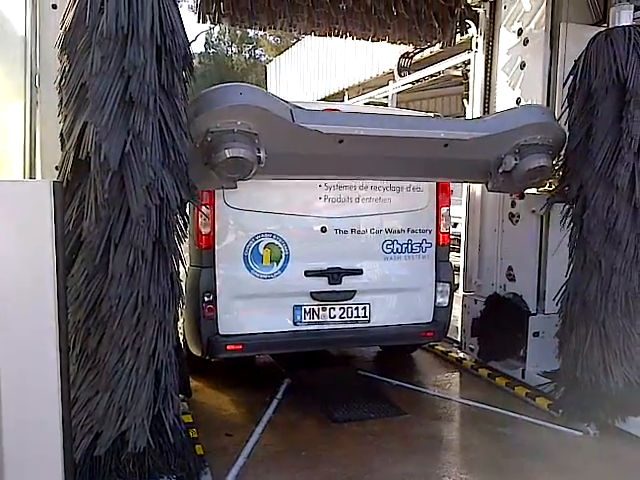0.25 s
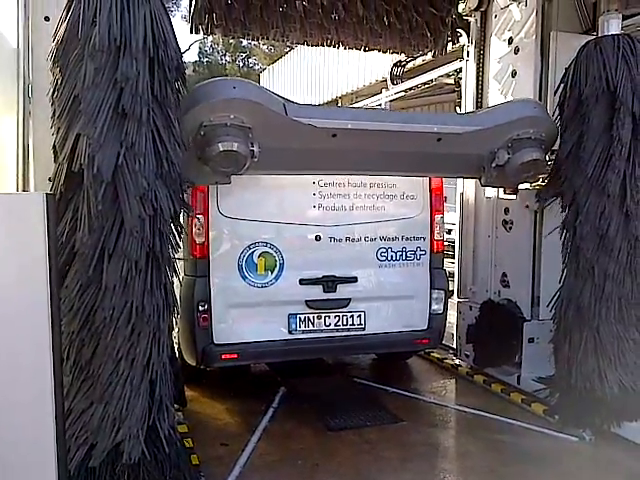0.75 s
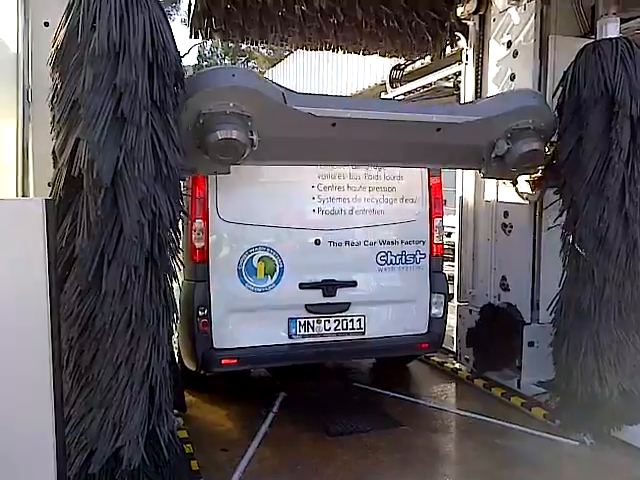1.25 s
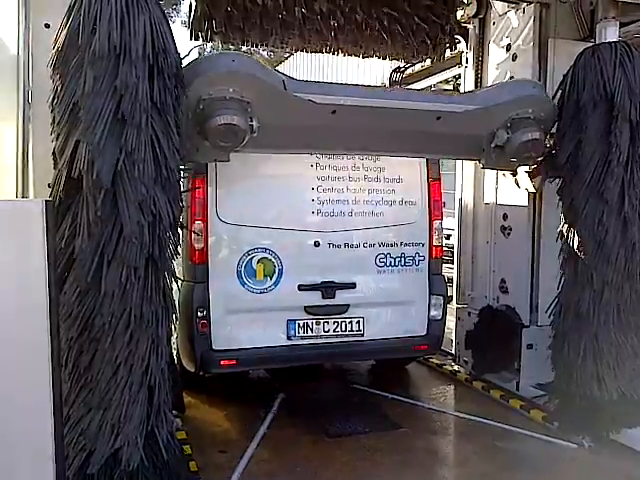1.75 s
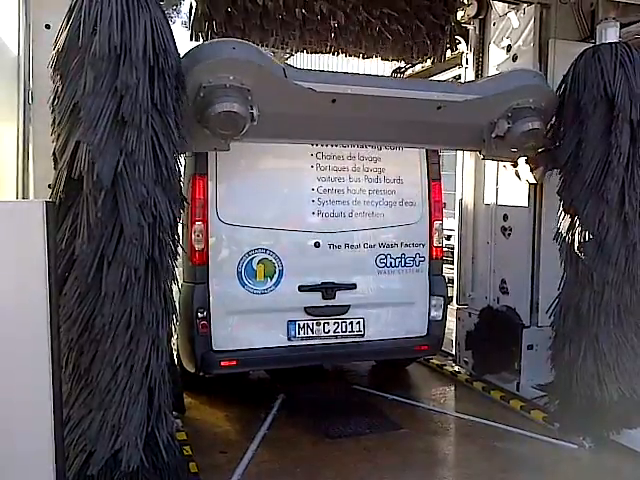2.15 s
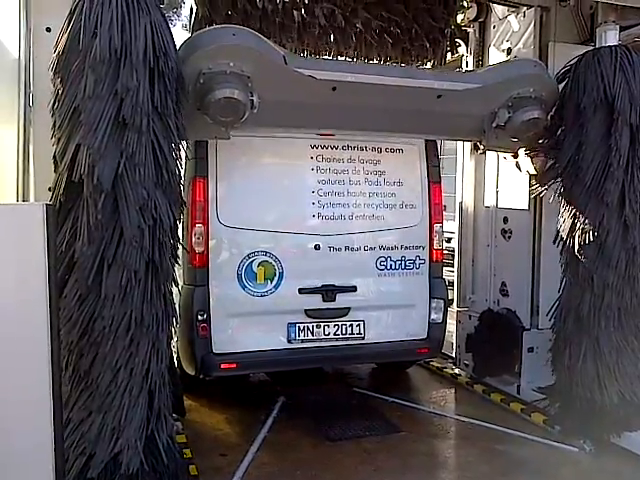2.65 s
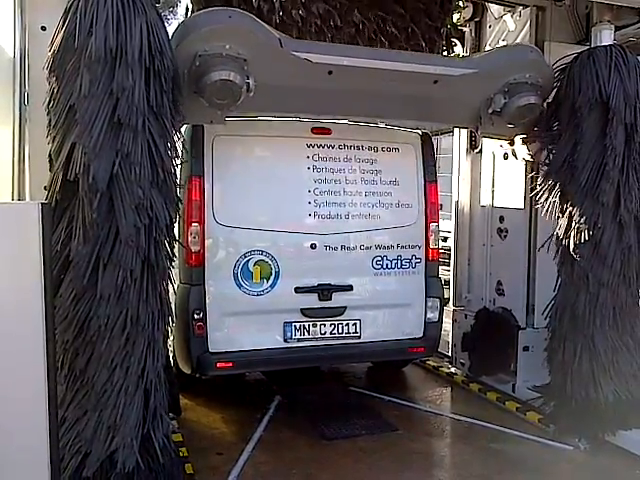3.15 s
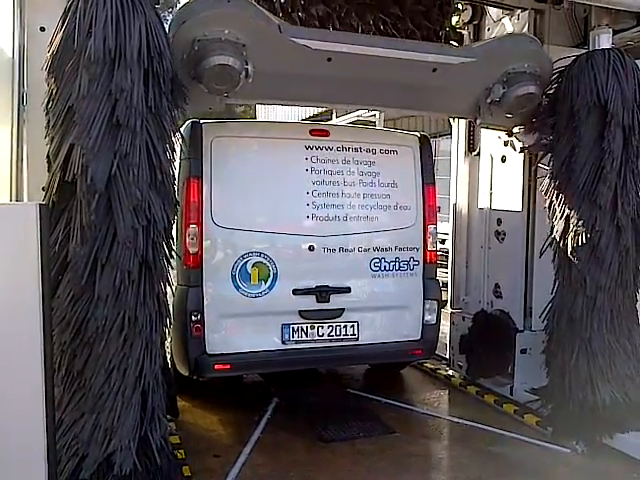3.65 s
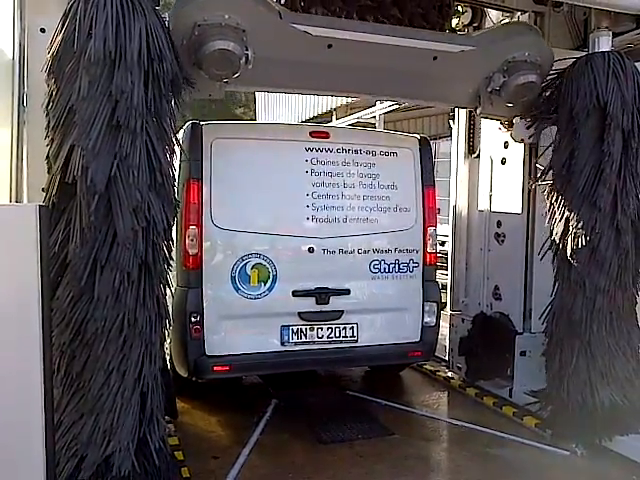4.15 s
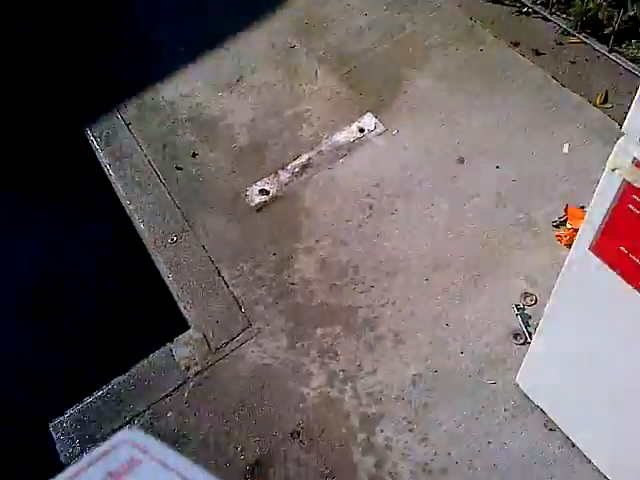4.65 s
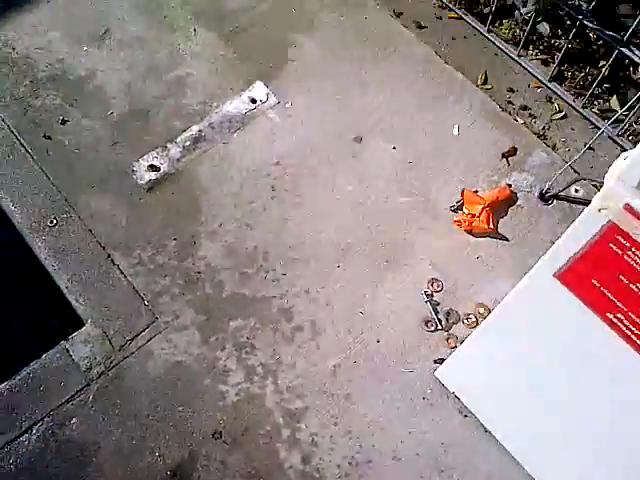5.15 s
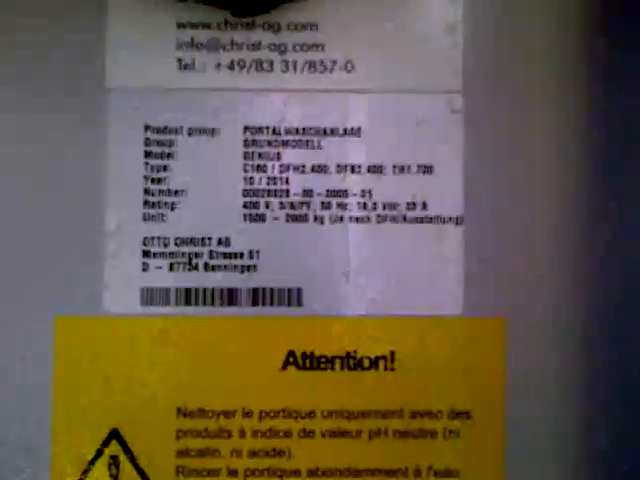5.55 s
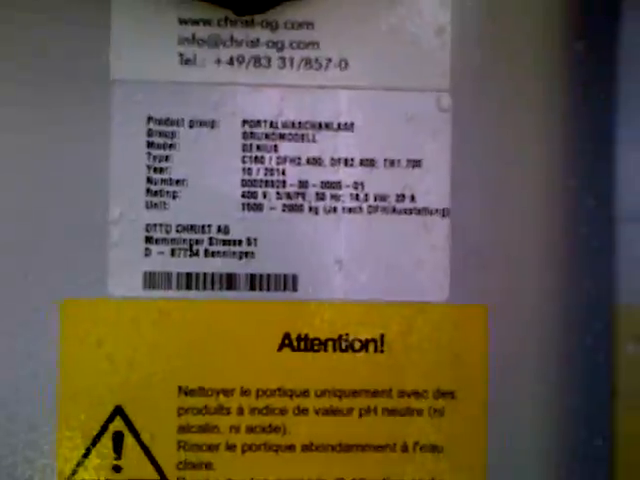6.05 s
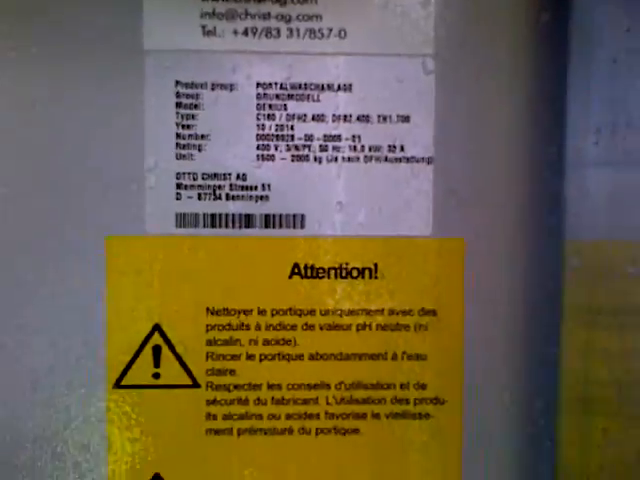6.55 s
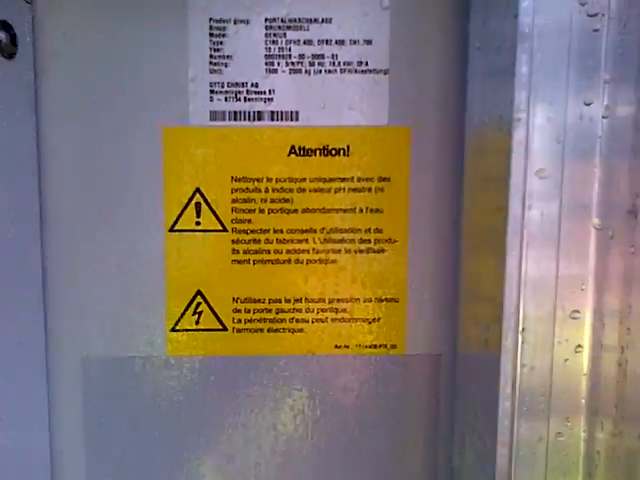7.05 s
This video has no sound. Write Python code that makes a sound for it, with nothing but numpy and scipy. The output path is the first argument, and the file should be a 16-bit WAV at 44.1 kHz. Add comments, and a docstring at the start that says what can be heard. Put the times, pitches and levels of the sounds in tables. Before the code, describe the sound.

Steady brush-and-water rush with a beating mid-pitched hum dulls as the microphone turns away, ticks slightly, then snaps to hissing spray beside a panel.

```python
"""Wet brushes and spray rush over a van in a rollover car wash: noise and drop impacts, coloured by filters.
Behind them two drive motors hum in slow beats (paired sines), a pump whines (sines) and a faint rumble lies below.
The microphone turns away from the bay, which dulls the rush, and short pulses make small handling ticks.
Then, with a click, the sound switches at once to bright spray close beside a metal panel of the machine,
where sliding filters make the rush ring; the hum is gone and the pump whine goes on."""
import sys
import numpy as np
from scipy import signal
from scipy.fft import rfft, irfft, next_fast_len
from scipy.io import wavfile
from scipy.ndimage import map_coordinates

SR = 44100
rng = np.random.default_rng(int(sys.argv[2]) if len(sys.argv) > 2 else 0)


def wav_record(signal):
    """Record a signal, one row per channel, as 16-bit PCM in the file named by sys.argv[1]."""
    frames = np.transpose(np.atleast_2d(signal))
    bounded = np.clip(frames, -1, 1)
    # unit amplitude maps onto the largest positive 16-bit level
    quanta = np.round(bounded * 32767).astype(np.int16)
    wavfile.write(sys.argv[1], SR, quanta)


N = 321434
TIME = np.arange(N) / SR  # s
HZ = np.fft.rfftfreq(N, 1 / SR)
SWITCH_S = 5.5772  # from the bay to the close spray


def gain_of(db):
    """Turns decibels into amplitude."""
    return 10 ** (np.asarray(db) / 20)


def evened(x):
    """Scales a sound to an average (rms) level of 1."""
    return x / np.sqrt(np.mean(x ** 2) + 1e-20)


def curve(rows, axis=1):
    """Joins one column of a table by straight lines in time."""
    columns = np.transpose(rows)
    return np.interp(TIME, columns[0], columns[axis])


def wander(rate_hz):
    """Random drift of rms 1, mostly slower than the given rate."""
    size = next_fast_len(N, real=True)
    hz = np.fft.rfftfreq(size, 1 / SR)
    slow = rfft(rng.standard_normal(size)) / (1 + (hz / rate_hz) ** 4)
    return evened(irfft(slow, size)[:N])


def tone(db, phase):
    """A pure tone with the given rms level in dB."""
    return gain_of(db) * np.sqrt(2) * np.sin(phase)


def pulse(s, rise_s):
    """A single push from time s: it reaches 1 after rise_s, then dies away."""
    u = np.clip((TIME - s) / rise_s, 0, 40)
    return u * np.exp(1 - u)


def band(x, hz, width):
    """Picks out one fixed band, like a resonance with gain 1 at its centre."""
    return signal.lfilter(*signal.iirpeak(hz, hz / width, fs=SR), x)


def resonate(x, hz, width):
    """Picks out a moving band: shift it down to zero, smooth it, shift it back up."""
    turn = np.exp(2j * np.pi * np.cumsum(hz) / SR)
    r = np.exp(-np.pi * width / SR)
    smoothed = signal.lfilter([1 - r], [1, -r], x / turn)
    return 2 * (turn * smoothed).real


def lifted(x, rows, width):
    """Raises or lowers one moving band; rows are (time [s], frequency [Hz], lift [dB])."""
    return x + resonate(x, curve(rows), width) * (gain_of(curve(rows, axis=2)) - 1)


def spectrum(points):
    """Joins points of a tone colour in dB along a logarithmic frequency axis."""
    hz, db = np.transpose(points)
    return np.interp(np.log(HZ + 1), np.log(hz + 1), db)


def lifts(modes):
    """Adds up bell-shaped peaks and dips in dB, one for each resonance."""
    return sum(db * np.exp(-2 * ((HZ - hz) / width) ** 2) for hz, width, db in modes)


def coloured(x, db):
    """Filters noise to a tone colour, scaled so the part above 500 Hz has rms 1 for white noise."""
    gain = gain_of(db)
    return irfft(rfft(x) * gain / np.sqrt(np.mean(gain ** 2 * (HZ > 500))), N)


def water(drops_per_s, drops_db, spread_db, flutter_db, flutter_hz):
    """Fine mist (noise) plus single drop impacts of random size, in uneven flurries."""
    sizes = gain_of(spread_db * np.minimum(rng.exponential(1, N), 4)) * rng.choice([-1, 1], N)
    drops = evened(sizes * (rng.random(N) < drops_per_s / SR))
    mist = rng.standard_normal(N)
    flurries = gain_of(flutter_db * wander(flutter_hz))
    return evened((mist + gain_of(drops_db) * drops) * flurries)


# how far the microphone has turned from the bay: (time [s], share turned away [0-1])
TURN_AWAY = [(0, 0.02), (4.47, 0.05), (4.51, 0.55), (4.8, 0.68), (5.1, 0.9), (5.57, 0.79)]


def turned_away():
    """The share of the turn made so far; it fades the rush between two colours and shifts the hum's beat."""
    return curve(TURN_AWAY)


def shade_db():
    """The level in dB lost as the microphone swings away from the bay."""
    shade, swing_s, swing_length_s = -5, 4.475, 0.11  # dB, s, s
    return shade * np.clip((TIME - swing_s) / swing_length_s, 0, 1)


def rumble(bay_db, close_db, corner_hz):
    """The little deep rumble that the small microphone lets through: noise without its treble."""
    low = evened(irfft(rfft(rng.standard_normal(N)) / (1 + (HZ / corner_hz) ** 4), N))
    return low * gain_of(np.where(TIME < SWITCH_S, bay_db, close_db))


def switch_click(snap_db, thump_db, thump_s):
    """A very short snap and a longer opposite push mark the sudden change."""
    snap = gain_of(snap_db) * pulse(SWITCH_S, 0.00005)
    return snap - gain_of(thump_db) * pulse(SWITCH_S, thump_s)


def tick(s, db, hz, length, edge_db):
    """A sharp contact of a few cycles, a little scuff and the brief ring of the plastic case."""
    turns = 2 * np.pi * (TIME - s)
    scratch = evened(band(rng.standard_normal(N), hz=4600, width=1100))
    scuff = gain_of(-16) * scratch * pulse(s, 1.6 * length)
    ring = pulse(s, length / 2) * np.sin(hz * turns)
    edge = gain_of(edge_db) * pulse(s, 0.00016) * np.sin(5100 * turns)
    return gain_of(db) * (ring + scuff) + edge


# bright ticks, before softening; the ring rises in half the length, the scuff in 1.6 times the length:
# (time [s], strength of ring and scuff [dB], ring frequency [Hz], length [s], strength of sharp edge [dB])
HANDLING_TICKS = [(4.4765, -17.5, 4480, 0.0012, -20), (4.8120, -22, 4500, 0.0005, -25),
                  (4.8135, -30, 5500, 0.0005, -34), (5.0145, -20, 3900, 0.0008, -27),
                  (5.0190, -29, 4900, 0.0009, -35), (5.5183, -14.5, 5200, 0.00064, -23),
                  (5.558, -18, 4463, 0.00065, -22.5)]
# dull bumps: (time [s], peak level [dB], rise time [s])
HANDLING_BUMPS = [(3.52, -55, .005), (4.493, -45, 0.0028), (5.016, -45, .0007)]


def handling():
    """Short plastic ticks and dull bumps of the hand; the microphone softens the ticks above 6300 Hz."""
    soften = signal.butter(6, 6300, fs=SR, output="sos")
    ticks = signal.sosfilt(soften, sum(tick(*row) for row in HANDLING_TICKS))
    bumps = sum(gain_of(db) * pulse(s, rise_s) for s, db, rise_s in HANDLING_BUMPS)
    return ticks + bumps


# the main whine, before a small random waver: (time [s], level [dB])
PUMP_WHINE = [(0, -46.5), (.9, -34), (1.4, -42), (1.8, -30), (1.98, -41), (2.22, -30.5), (2.37, -25.5),
              (2.6, -37), (2.76, -32), (3.15, -33), (3.6, -48), (4.7, -38), (5.55, -52.5), (5.6, -28.5),
              (6.75, -47.5), (7.08, -41), (7.22, -21), (7.29, -33)]
# the slightly lower whine, before its waver: (time [s], level [dB])
LOWER_WHINE = [(0, -50), (.3, -37.5), (1.0, -37.5), (1.3, -46.5), (3.8, -46.5), (4.1, -33.5), (4.5, -45),
               (7.29, -48)]


def pump():
    """Thin wavering whines: a tone, its octave (stronger beside the panel) and a slightly lower tone."""
    pump_hz, lower_hz = 1712, 1626
    octave_bay_db, octave_close_db = -52, -40.5
    phase = 2 * np.pi * pump_hz * TIME + 0.45 * wander(5) + 0.12 * wander(25)
    whine = tone(curve(PUMP_WHINE) + 0.74 * wander(12), phase)
    octave_db = np.where(TIME < SWITCH_S, octave_bay_db, octave_close_db)
    octave = tone(octave_db + 2.0 * wander(7), 2 * phase)
    lower_phase = 2 * np.pi * lower_hz * TIME + 0.5 * wander(4.4)
    lower = tone(curve(LOWER_WHINE) + 2.1 * wander(4.5), lower_phase)
    return whine + octave + lower


# both motors, before a small random waver:
# (time [s], level of the first motor [dB], strength of the second relative to the first [0-1])
MOTOR_HUM = [(0, -33, 1), (.34, -30.5, 0.7), (.66, -40, 0.95), (.78, -23.5, 0.1), (.87, -27, 0),
             (1.0, -23.5, 0), (1.14, -19, 0), (1.23, -31.5, 0.6), (1.33, -25.5, .5), (1.47, -30, 0.65),
             (1.53, -20.5, 0.5), (1.68, -45, 0.9), (1.88, -27, 0.54), (1.97, -24, .45), (2.06, -26, 0.1),
             (2.13, -22.5, 0.2), (2.2, -28, 0.15), (2.42, -19.5, 0), (2.7, -24, 0.24), (3.0, -22.5, 0.53),
             (3.12, -23.5, 0.46), (3.38, -22.5, 0), (3.5, -21.5, 0.8), (3.66, -27, 0.93),
             (4.2, -26.5, 0.37), (4.28, -23, 0.26), (4.48, -24, 0.7), (4.56, -19.5, 0.6),
             (4.68, -18.3, 0.5), (4.8, -19, 0.74), (5.07, -18, 0.6), (5.57, -17, 0.33)]
HUM_HZ = 437.9  # average of the first motor


def drive():
    """Two motors slightly out of step add and cancel in turn, so the hum throbs; turning shifts the beat."""
    beat_hz, octave_db = 2.03, -36  # the second motor runs lower by the beat
    first_lull_s, turn_shift = 0.19, -0.48  # s (before the turn's shift), cycles at a full turn
    phase = 2 * np.pi * np.cumsum(HUM_HZ + 0.56 * wander(4.6)) / SR + 0.054 * wander(23)
    beat = 2 * np.pi * (beat_hz * (TIME - first_lull_s) + turn_shift * turned_away())
    level = curve(MOTOR_HUM) + 1.1 * wander(22) + 0.3 * wander(5.5)
    second = np.clip(curve(MOTOR_HUM, axis=2), 0, 1) * tone(level, phase - beat)
    hum = tone(level, phase) - second
    octave_level = octave_db + shade_db() + 0.94 * wander(16)
    octave = tone(octave_level, 2 * phase - beat + 0.5 * wander(7.9))
    return hum + octave


# tone colour beside the panel: (frequency [Hz], relative level [dB])
BESIDE_PANEL = [(76, -56), (130, -38), (246, 0.5), (286, -1), (443, -12.5), (466, -10), (542, -2),
                (641, -11), (746, -6.5), (1010, -8), (1390, -5.5), (2460, -4.5), (3560, -6), (6190, -18.5),
                (7200, -35), (9360, -90), (15800, -120)]
# resonances of the machine's housing: (frequency [Hz], width [Hz], lift [dB])
HOUSING_RESONANCES = [(245, 27, 1.5), (288, 22, 2), (437, 86, 7), (591, 72, 4), (659, 30, 6),
                      (737, 65, 6.5), (856, 76, 7.5), (1035, 68, 2), (2410, 250, -5.5)]
# the way out from behind the panel: (time [s], share covered [0-1])
WAY_OUT = [(5.58, 0), (6.45, 0.22), (6.75, 0.43), (6.95, 0.8), (7.15, 1), (7.29, 1)]
# extra colour behind the panel: (frequency [Hz], width [Hz], lift [dB])
BEHIND_PANEL = [(1390, 260, 4.5), (2760, 480, -7.5), (5500, 1200, -3.5)]
# extra colour clear of the panel: (frequency [Hz], width [Hz], lift [dB])
CLEAR_OF_PANEL = [(348, 150, -4), (815, 130, -10), (1660, 350, 1.5), (5340, 530, 2)]
# the gap to the panel rings, sinking as the microphone backs off: (time [s], frequency [Hz], lift [dB])
GAP_RING = [(5.58, 3650, 3), (6.0, 3630, 3), (6.18, 3520, 3.5), (6.33, 3450, 6), (6.5, 3280, 5),
            (6.64, 3120, 6), (6.8, 2920, 2.5), (7.29, 2640, -15.5)]
# the hollow behind the panel rings and fades on stepping out: (time [s], frequency [Hz], lift [dB])
HOLLOW_RING = [(5.58, 1330, 3.5), (5.9, 1360, 1.5), (6.06, 1480, 5), (6.28, 1400, 2.5), (6.43, 1360, 3.5),
               (6.7, 1330, 1)]
# a lower ring that sinks on the way out: (time [s], frequency [Hz], lift [dB])
LOWER_RING = [(6.65, 2050, -2), (6.95, 1900, 1.5), (7.04, 1860, 4), (7.14, 1630, 5), (7.29, 1570, 2.5)]
# a higher ring that sinks on the way out: (time [s], frequency [Hz], lift [dB])
HIGHER_RING = [(6.65, 6500, 1.5), (6.82, 6300, 3.5), (6.98, 5500, 1), (7.14, 5320, 3.5), (7.29, 5000, 1.5)]
# lower sinking band that the panel's reflection weakens: (time [s], frequency [Hz], lift [dB])
LOWER_NOTCH = [(5.58, 2520, -7), (6.0, 2490, -0.5), (6.25, 2440, -1), (6.6, 2350, -1)]
# higher sinking band, weakened most midway: (time [s], frequency [Hz], lift [dB])
HIGHER_NOTCH = [(6.2, 5800, 1.5), (6.5, 5450, -0.5), (6.7, 4900, -8), (6.82, 4400, 0.5), (7.29, 4300, -3)]


def spray():
    """Close spray, coloured by the housing; rings and notches slide down as the gap to the panel widens."""
    close_db, onset_db, settle_s, clear_db = -16.5, 2, 0.08, 0.64  # starts louder, settles, gains when clear
    jets = water(drops_per_s=3700, drops_db=-5.5, spread_db=0.5, flutter_db=0.5, flutter_hz=60)
    housing = spectrum(BESIDE_PANEL) + lifts(HOUSING_RESONANCES)
    behind = coloured(jets, housing + lifts(BEHIND_PANEL))
    clear = coloured(jets, housing + lifts(CLEAR_OF_PANEL))
    out = curve(WAY_OUT)
    rush = (1 - out) * behind + out * clear
    rush = lifted(rush, GAP_RING, width=240)
    rush = lifted(rush, HOLLOW_RING, width=130)
    rush = lifted(rush, LOWER_RING, width=180)
    rush = lifted(rush, HIGHER_RING, width=420)
    rush = lifted(rush, LOWER_NOTCH, width=220)
    rush = lifted(rush, HIGHER_NOTCH, width=360)
    onset = np.exp(-np.maximum(TIME - SWITCH_S, 0) / settle_s)
    return rush * gain_of(close_db + onset_db * onset + clear_db * out)


def bounced(x, rows):
    """Adds one reflection whose path changes; rows are (time [s], delay [s], strength [0-1])."""
    place = np.arange(N) - curve(rows) * SR
    return x + curve(rows, axis=2) * map_coordinates(x, [place], order=3)


def swell(x, s, length, hz, db, width):
    """What one narrow band adds while it swells and sinks around time s."""
    shape = np.exp(-np.minimum(((TIME - s) / length) ** 2, 40))
    return band(x, hz, width) * (gain_of(db) - 1) * shape


# tone colour facing the bay: (frequency [Hz], relative level [dB])
FACING_BAY = [(76, -59.5), (130, -40.5), (226, -13.5), (311, -4.5), (400, -3.5), (500, -4), (800, -6.5),
              (1190, -8.5), (2110, -9.5), (2910, -23.5), (3440, -24), (5320, -24.5), (5890, -29),
              (7200, -48), (9000, -91.5)]
# resonances of the bay: (frequency [Hz], width [Hz], lift [dB])
BAY_RESONANCES = [(202, 14, 3), (262, 30, 1.5), (311.7, 46, -8), (560, 50, 2.5), (645, 29, 1.5),
                  (766, 16, -7.5), (1600, 140, 1), (2157, 200, 2), (3470, 510, 4)]
# tone colour turned away from the bay: (frequency [Hz], relative level [dB])
FACING_AWAY = [(76, -80.5), (130, -51.5), (255, -19.5), (420, -15.5), (510, -18), (880, -22), (1050, -24.5),
               (1700, -23.5), (2420, -34.5), (3740, -34.5), (4570, -42), (5790, -45.5), (7200, -69.5),
               (9000, -100)]
# reflections from the ground and the cabinet while turned away: (frequency [Hz], width [Hz], lift [dB])
GROUND_REFLECTIONS = [(1390, 340, 1.5), (2200, 170, -1.5), (2640, 180, 2.5), (3150, 240, -0.5),
                      (3820, 450, 4.5), (4550, 300, -2.5)]
# the back of the van, uncovered as the brush rises, reflects the rush:
# (time [s], delay [s], strength [0-1])
VAN_ECHO = [(1.5, 0.0026, 0.07), (2.05, 0.0021, 0.02), (2.25, 0.0023, 0.1), (3.0, 0.0023, 0.13),
            (3.7, 0.0024, 0.06), (4.4, 0.0025, 0.19), (4.9, .00232, 0.14)]
# narrow bands that swell briefly: (time [s], half length [s], frequency [Hz], lift [dB])
RUSH_SWELLS = [(0.149, 0.27, 2000, 6.5), (.62, 0.098, 1980, 5.5), (1.758, 0.11, 1770, 5.5),
               (2.04, .1, 3100, 8), (2.36, .17, 1725, 3), (2.36, 0.17, 2190, 4), (2.33, .15, 3490, 6.5),
               (3.629, 0.088, 2130, 4)]


def brushes():
    """Wet strands patter on the van; the bay colours the rush and turning away shades its treble."""
    bay_db = -20.5
    patter = water(drops_per_s=3000, drops_db=-5, spread_db=2.5, flutter_db=0.42, flutter_hz=30)
    facing = coloured(patter, spectrum(FACING_BAY) + lifts(BAY_RESONANCES))
    away = coloured(patter, spectrum(FACING_AWAY) + lifts(GROUND_REFLECTIONS))
    turn = np.clip(turned_away(), 0, 1)
    rush = (1 - turn) * bounced(facing, VAN_ECHO) + turn * away
    # bunches of strands land together and drum on the body panels
    drumming = band(rush, hz=480, width=250) * (gain_of(1.0 * wander(6.6)) - 1)
    swells = sum(swell(rush, *row, width=46) for row in RUSH_SWELLS)
    return (rush + drumming + swells) * gain_of(bay_db + shade_db())


def scene():
    """Brushes and hum up to the switch, close spray after it; the pump runs throughout."""
    last_cycle = np.clip((SWITCH_S - TIME) * HUM_HZ, 0, 1)  # fades the hum within its last cycle
    bay = brushes() + last_cycle * drive()
    wash = np.where(TIME < SWITCH_S, bay, spray())
    deep = rumble(bay_db=-69.5, close_db=-60.0, corner_hz=170)
    small = handling() + switch_click(snap_db=-14, thump_db=-20, thump_s=0.0004)
    return (wash + pump() + deep + small)[None]


def record(dry):
    """Flattens the rare highest peaks, fades in over 5 ms, then removes the treble above the band edge."""
    edge_hz = 7450
    limited = np.clip(dry, -0.68, 0.68) * np.minimum(TIME / 0.005, 1)
    lowpass = signal.firwin(301, edge_hz, window=("kaiser", 9), fs=SR)
    return signal.oaconvolve(limited, lowpass[None], "same")


dry = scene()
out = record(dry)
wav_record(out)
```